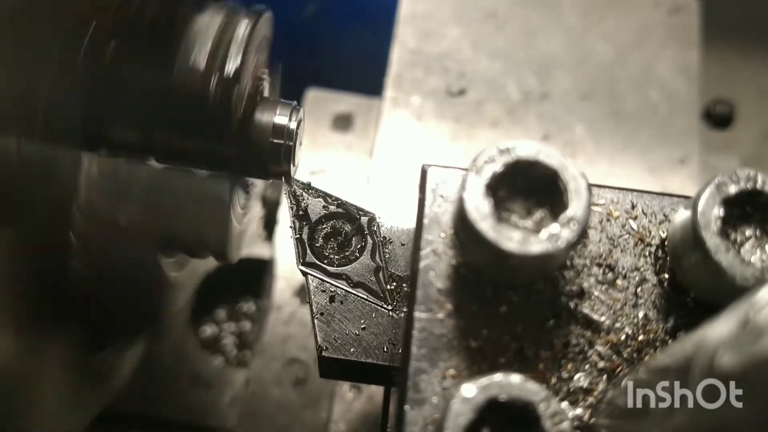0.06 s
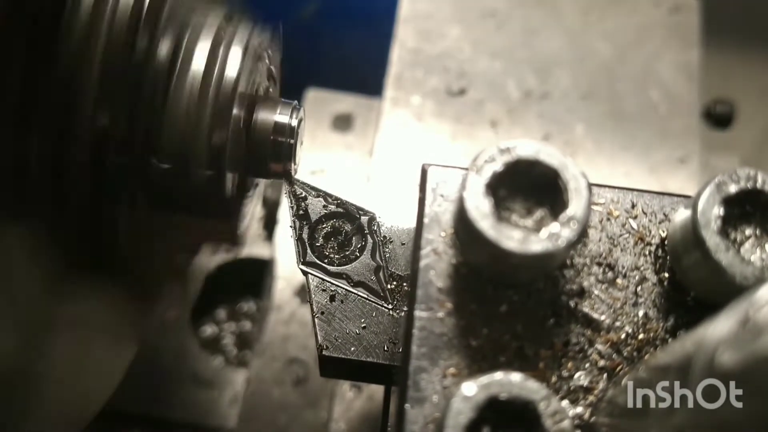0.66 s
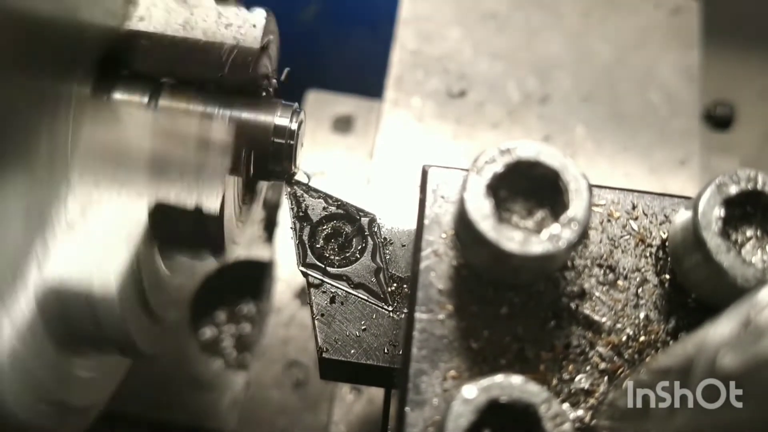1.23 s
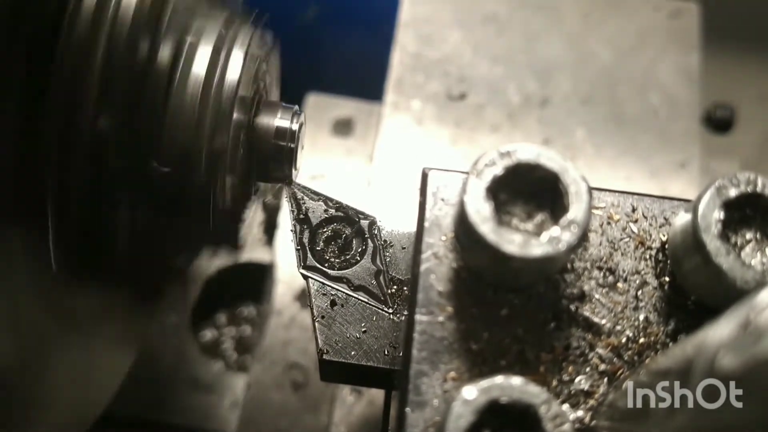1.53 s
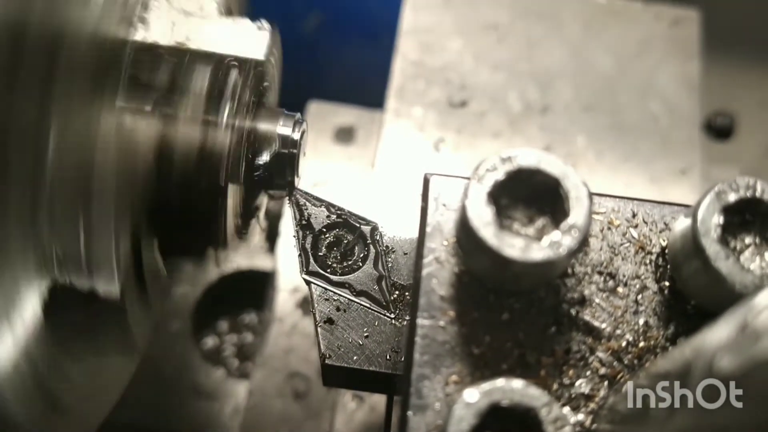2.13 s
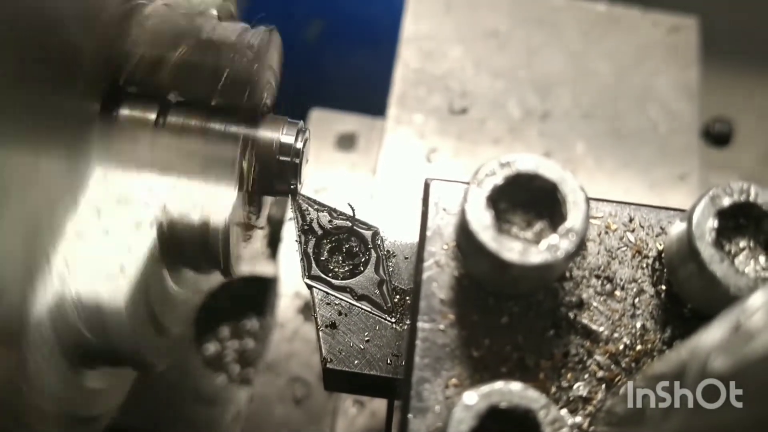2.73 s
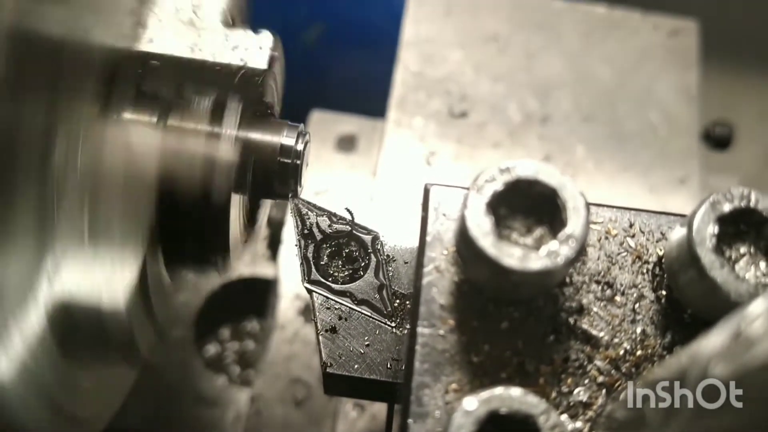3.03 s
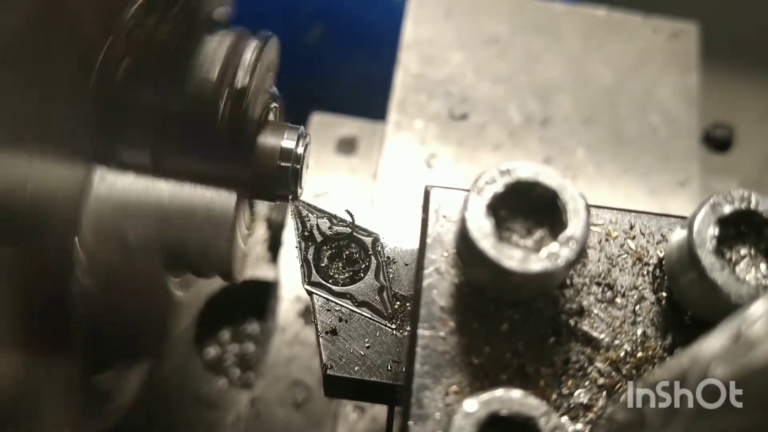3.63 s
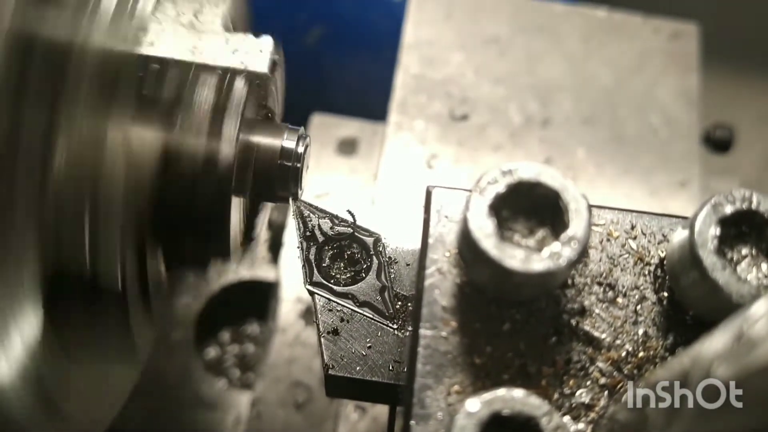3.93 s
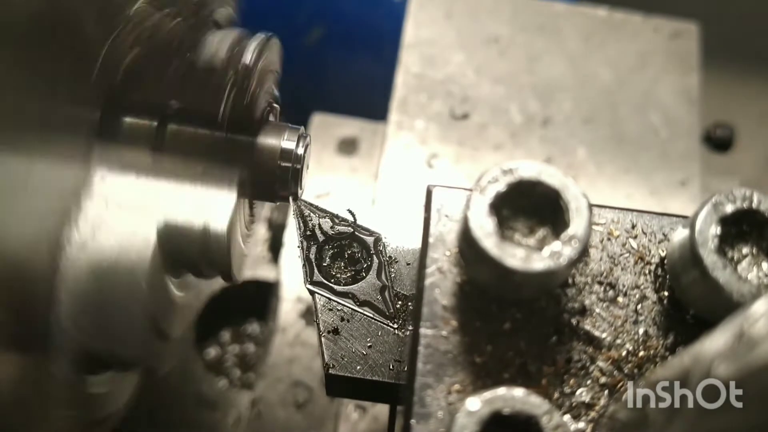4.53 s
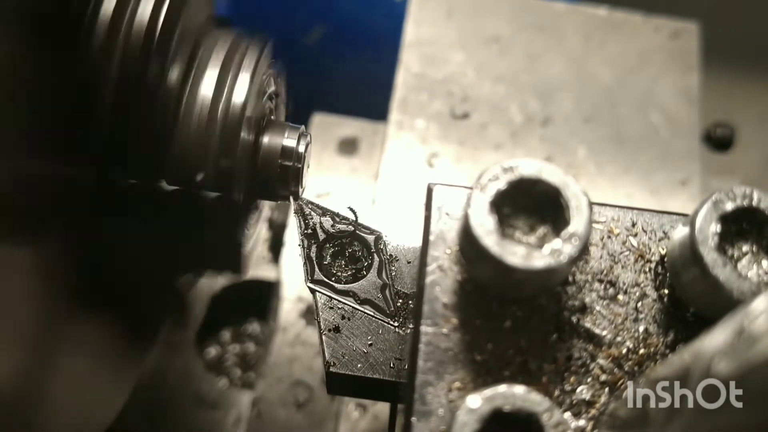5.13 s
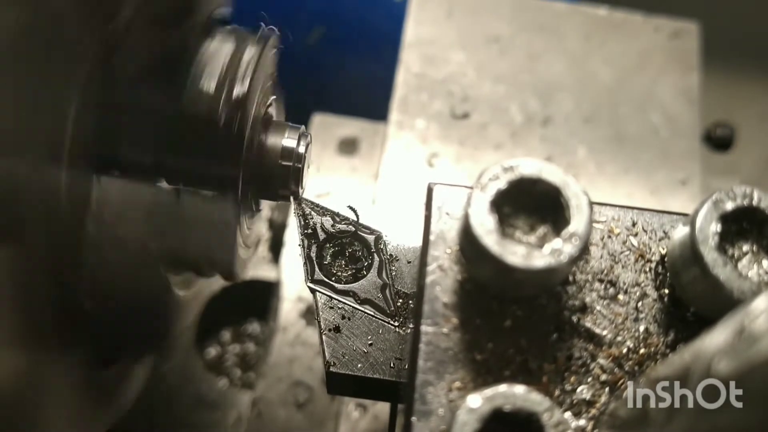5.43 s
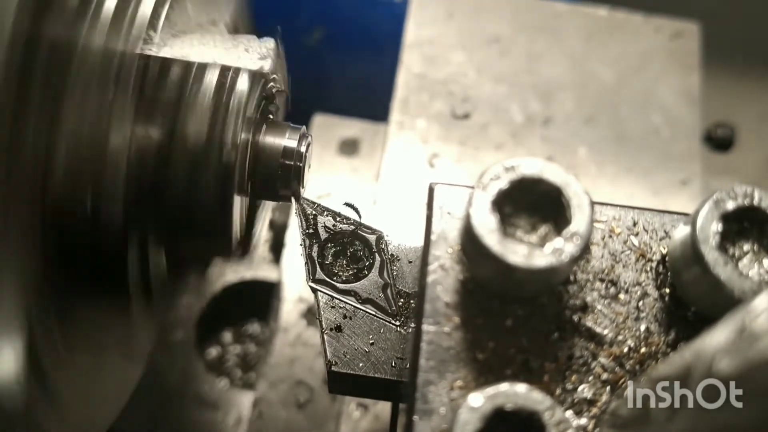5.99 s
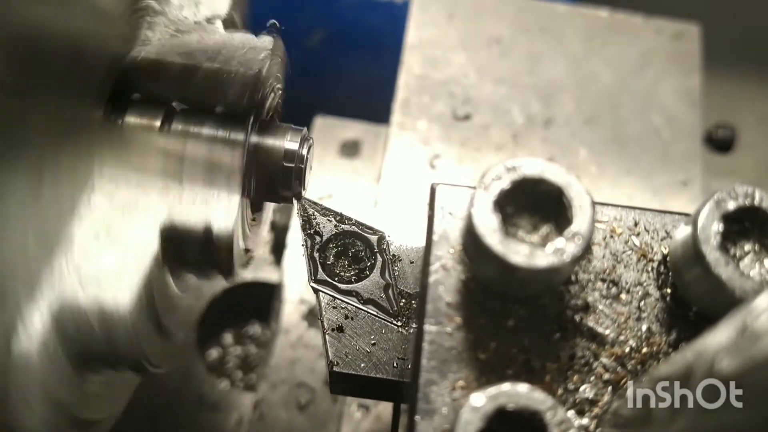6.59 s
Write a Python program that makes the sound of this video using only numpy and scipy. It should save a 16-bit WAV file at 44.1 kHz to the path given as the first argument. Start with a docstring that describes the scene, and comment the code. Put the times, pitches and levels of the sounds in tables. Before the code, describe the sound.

Close metal turning on a lathe: rhythmic scraping and knocks grow into loud chatter, pause briefly, then return with a piercing squeal.

```python
"""A small lathe, close up, turns a hardened steel part in two passes over the hum and whine of its drive.
First the part's high spots rasp and chirp on the tool tip, once a turn. The cut deepens, single bites
knock the tool post, then it breaks into chatter until the tool is drawn back near 3 s, leaving the drive.
From 4 s the tip grazes the steel again and sticks and slips in one long, sinking squeal. Near 5.6 s
this breaks up into short squeals, while rasp and chatter build once more."""
import sys
import numpy as np
from scipy import signal
from scipy.fft import rfft, irfft, next_fast_len
from scipy.io import wavfile
from scipy.ndimage import uniform_filter1d

SR = 44100
rng = np.random.default_rng(int(sys.argv[2]) if len(sys.argv) > 2 else 0)


def unload_wav(signal):
    """Save mono or channel-first audio to the path in sys.argv[1] as 16-bit WAV at rate SR, clipped to [-1, 1]."""
    wavfile.write(
        sys.argv[1],
        SR,
        np.round(np.clip(np.atleast_2d(signal).T, -1, 1) * 32767).astype(np.int16),
    )


N = 297671
TIME = np.arange(N) / SR
TURN_S, PASS_CHANGE_S = .1189, 3.5

# Workshop rumble. Each row: frequency in Hz, noise density in dB.
RUMBLE_SPECTRUM = [(15, -22), (35, -13), (55, -3), (90, -12), (200, -16), (1000, -70)]
# Stereo width of the noises. Each row: frequency in Hz, left-right likeness from 0 to 1.
STEREO_LIKENESS = [(30, 0.6), (150, 0.89), (300, 0.57), (700, 0.87), (1500, 0.15), (4000, 0.14),
                   (12000, 0.029)]
# Bearings and belt. Each row: frequency in Hz, noise density in dB.
BEARING_SPECTRUM = [(15, -55), (25, -56), (118, -13.5), (152, -10.5), (233, -17), (277, -10.5), (390, -9),
                    (519, -18), (756, -3), (972, -11.5), (1450, -11.5), (1960, -19), (4370, -28.5),
                    (5080, -24), (7590, -45.5), (10000, -29.5), (13000, -53), (22000, -120)]
# Motor and gear tones. Each row: pitch in Hz, level in dB within the drive.
DRIVE_TONES = [(156.1, -6.5), (208, -23), (264, -17), (280.5, -8), (604, -7.5), (687, -6), (728, -10.5),
               (781, -4), (843, -6.5), (1054.5, -5.5), (1405, -3.5)]
# Sidebands of the motor supply's switching whine. Each entry: offset in multiples of the field rate.
WHINE_ORDERS = [-12, -11, -10, -9, -8, -7, -5, -4, -3, -1, 0, 1, 2, 3, 5, 6, 9]
# The same sidebands. Each entry: level in dB within the drive.
WHINE_DB = [-20, -20, -20, -15, -18, -15, -20, -14, -11, -12, -6.5, -15, -10, -8.5, -18, -18, -19]
WHINE_HZ, FIELD_HZ = 11922, 52
# The drive ducks under the chatter. Each row: chatter level in dB, drive level in dB.
DRIVE_DUCKING = [(-48, -42), (-33, -43), (-21.5, -45.5), (-16, -56)]

# The first cut deepens until the tool is drawn back. Each row: time in seconds, chatter level in dB,
# rasp level in dB, rasp tilt (higher is brighter).
FIRST_CUT = [(0, -45, -35.5, 18), (0.3, -32.5, -29, 3.5), (0.85, -28.5, -24.5, 2.5), (1.15, -21, -29.5, -6),
             (1.33, -19, -28, -3.5), (1.55, -15, -30.5, -3.5), (2.4, -14.5, -38.5, -7),
             (2.72, -13, -35.5, -7), (2.83, -17, -23.5, 4.5), (2.97, -36.5, -78, -24.5)]
# The second cut deepens to the end. Each row reads as in the first cut.
SECOND_CUT = [(4.45, -39, -56, -12), (4.7, -37.5, -40, 14), (5.1, -35.5, -38, -2.5), (5.55, -30, -19.5, 2),
              (5.9, -24, -21, -1.5), (6.3, -19.5, -24, -1.5), (6.75, -18.5, -26, -4.5)]
# High spots in the first cut. Each row: place in turns, half width in turns, then boosts in dB for rasp,
# light chatter and deep chatter.
FIRST_SPOTS = [(.045, 0.045, 4, -1, 2), (.135, 0.065, 8.5, 1, -5), (.21, 0.063, 7.5, -6.5, 4),
               (.34, 0.027, 1, 6, 1.5), (.545, 0.024, 2, -0.5, -7), (.755, 0.068, -2.5, 7, 3.5),
               (.872, 0.038, 11, 3.5, 3.5), (.92, 0.029, 6, -1.5, 4)]
# High spots in the second cut. Each row reads as in the first.
SECOND_SPOTS = [(.07, 0.04, -2.5, 3, 1), (.208, 0.027, 11, -18, -6), (.275, .045, 3, 1, -3),
                (.46, 0.097, -4.5, 3, 6), (.6, 0.057, 11, 5, 4), (.705, .06, 3.5, 3.5, 7),
                (.84, 0.06, 8.5, 2, 2), (.92, 0.029, 6.5, -1.5, 4)]
# Stereo spread of the cut. Each row: frequency in Hz, left over right in dB, left phase lead in radians.
CUT_BALANCE = [(1210, -2.5, 1.24), (2540, -2.5, 0), (2800, 5.5, -0.3), (3245, -1, 1.06), (3570, 7, 0.2),
               (3870, -3.5, -3), (3930, -4, 2.5), (4970, -0.5, 0), (5150, -4, -1.4), (5630, 3, -1.54),
               (6120, -7, -0.77), (6760, -1.5, -0.2), (7065, 3, 3.5), (7340, -1, 1.04), (9750, -3.5, 1),
               (10260, -7.5, -1.05), (11500, -.5, -0.9), (12700, -4, -1.5), (14000, -2, -1)]

# Single bites that jolt the tool post. Each row: start in seconds, peak level in dB.
KNOCKS = [(.39, -28), (.511, -19), (.624, -14.5), (.745, -12), (.787, -21), (.865, -14.5), (.906, -16),
          (.985, -19), (1.026, -17.5), (1.071, -14.5), (1.103, -18), (1.148, -16.5), (1.186, -12),
          (1.223, -13), (1.269, -11.5), (1.304, -13), (5.534, -20.5), (5.657, -14), (5.782, -24),
          (5.864, -14.5), (5.901, -21), (6.022, -23), (6.141, -14)]
# The tool post's swing. Each row: time in seconds, pitch in Hz.
CHATTER_PITCH = [(.9, 723), (1.3, 704), (2.0, 714.5), (5.5, 714), (6.75, 701)]
LIGHT_CHATTER_DB, DEEP_CHATTER_DB = -17, -15  # crossfade from the light boosts to the deep ones
# Rubbing steel. Each row: frequency in Hz, EQ gain in dB.
RASP_SPECTRUM = [(560, -7.5), (950, 3), (1250, -6.5), (2000, -6), (2600, -7), (3150, -6), (3900, -7.5),
                 (4500, -3), (5300, -5), (6300, -8.5), (7400, -9), (8400, -16), (10200, -9), (11000, -11),
                 (13500, -8.5), (15900, -16)]
# Resonances of tool and part. Each row: frequency in Hz, width in Hz, relative level in dB.
TOOL_MODES = [(1443, 300, -4), (2630, 48, 0), (2959, 43, -5.5), (3738, 25.7, -0.5), (4365, 150, -6.5),
              (6110, 33, -20), (6930, 40, -37), (9980, 170, -3.5)]

# The tip just grazes the steel. Each row: start in seconds, length in seconds, pitch in Hz, level in dB.
GRAZES = [(0.897, 0.0074, 5550, -14.5), (0.906, 0.011, 5484, -24), (2.83, 0.035, 3505, -29),
          (2.859, 0.02, 3564, -22.5), (4.01, 0.0074, 3646, -17.5), (4.04, 0.017, 3550, -17.5),
          (4.082, 0.0074, 3600, -16.5), (4.125, 0.0083, 3630, -18), (4.158, .013, 3620, -15),
          (4.276, 0.012, 3655, -15), (4.512, 0.015, 3647, -16), (4.554, 0.01, 3655, -18),
          (4.592, 0.022, 3540, -17.5), (4.624, 0.024, 3536, -18), (4.665, 0.021, 3510, -18.5)]
GRAZE_GLIDE, GRAZE_HALF_DB = .06, -29.5  # share of pitch; base half-order level
# A high spot catches the tip, which chirps, mostly upward, as it tears free. Each row: start and length
# in seconds, pitch in Hz, level in dB, glide as a share of pitch, base half-order level in dB.
CHIRPS = [(0, 0.021, 3036, -20.5, 0.13, -9), (.024, 0.0059, 3454, -16.5, 0.052, -12.5),
          (0.034, 0.02, 3150, -22.5, -0.0087, -15), (0.054, 0.0078, 4150, -16, 0.26, -7),
          (.101, .011, 3193, -23, -0.18, -14), (0.118, .021, 3020, -20, 0.14, -12),
          (0.143, 0.0058, 3470, -15.5, 0.021, -13.5), (0.154, 0.012, 3096, -22.5, -0.053, -10),
          (0.167, 0.0072, 3650, -16, 0.27, -5), (.221, 0.0089, 3163, -20, .08, -11),
          (.239, 0.0182, 3050, -20, 0.1285, -15), (.258, 0.00603, 3557, -18, .15, -9.5),
          (0.339, .01, 3470, -17, 0.41, -9), (.364, 0.017, 3220, -22.5, .12, -11.5),
          (.459, .01, 3590, -15, 0.34, -14), (0.484, 0.015, 3446, -21, 0.21, -8.5),
          (.579, .01, 3800, -13.5, 0.16, -15.5), (0.604, .015, 3460, -20, 0.15, -10),
          (0.7, .012, 3950, -13.5, .15, -16), (0.727, 0.01296, 3900, -17, .5, -8),
          (.819, .011, 4000, -13.5, 0.14, -24), (0.845, 0.0048, 3530, -20, .05, -14),
          (.855, .01, 4790, -14, 0.33, -5), (.938, .011, 4100, -14, 0.1, -16),
          (.97, 0.012, 4460, -13.5, 0.37, -14), (1.058, 0.007, 3910, -13.5, .1, -15),
          (1.086, .011, 4200, -18.5, 0.48, -9.5), (1.177, .007, 3950, -20, 0.18, -10.5),
          (1.208, .01, 4400, -18.5, .28, -7)]
# Spots that squeal once a turn. Each row: run start, run end and squeal length in seconds, first and last
# pitch in Hz, first and last level in dB, glide as a share of pitch, base half-order level in dB.
SQUEAL_RUNS = [(1.133, 1.55, 0.0066, 5330, 5165, -19, -17, .02, -32),
               (1.326, 1.98, 0.0084, 4550, 4490, -22.5, -33, .2, -6),
               (1.608, 2.02, 0.0088, 5320, 5150, -27, -23.5, .03, -28),
               (5.595, 5.77, 0.025, 3334, 3480, -23, -21, .04, -8.5),
               (5.681, 6.7, 0.018, 3105, 3277, -23.5, -32.5, .08, -7.5),
               (5.812, 6.7, 0.0085, 4457, 4390, -16.5, -19, -.01, -24),
               (5.848, 6.03, 0.0084, 3400, 3230, -23, -28.5, -.25, -8.5)]
SHORT_SAG = 0.038  # chirps and runs droop at both ends by this share of pitch
# The longer the tip sticks, the lower and brighter it squeals. Each row: pitch in Hz, overtone gain in dB.
BRIGHTNESS = [(2900, 0), (3350, -1), (3500, -11.5), (3620, -20.5), (4000, -27), (4400, -12), (5400, -33)]
# The tool body favours some squeal overtones. Each row: frequency in Hz, gain in dB.
OVERTONE_EQ = [(5500, -5), (5900, -2), (6350, 5), (7000, 2.5), (7700, -7), (8500, -23), (9600, 0),
               (10200, 7.5), (11000, -16), (12800, -1), (14000, -4), (16000, -16), (22000, -40)]
# The long squeal sinks as the cut deepens. Each row: time in seconds, centre pitch in Hz, level in dB,
# sag depth in Hz, sag on the part's high side in Hz.
LONG_SQUEAL = [(4.704, 3518, -20, 165, 30), (4.999, 3377, -20, 151, 50), (5.2, 3274, -19.5, 120, 89),
               (5.42, 3162, -19.5, 60.4, 204), (5.591, 3140, -23, 40, 219.4)]
SAGS_PER_TURN, SAG_TURN, HIGH_SIDE_TURN = 3, .275, .8
# Breaking up, it pumps more with the high spots. Each row: time in seconds, share of their boost.
SQUEAL_PUMPING = [(5.1, 0.054), (5.45, 0.59)]
# Partials of the long squeal. Each entry: a multiple of its pitch.
STICK_ORDERS = [.5, 1, 1.5, 2, 2.5, 3, 4]
# As it sags, every other slip weakens and half orders appear. Each row: pitch in Hz, grit level in dB,
# then the level of each partial in dB.
STICK_TIMBRE = [(3030, -9, -20.5, -1, -10.5, -7, -11, -16, -10),
                (3156, -14.5, -13, -2.5, -1.5, 1, -11.5, -21, -13),
                (3310, -20, -18.5, -5.5, -18, -3.5, -37, 0, -13),
                (3362, -23.5, -32, 1, -19, -8.5, -48, -2.5, -9.5),
                (3570, -34.5, -45, 1.5, -33, -15, -47, -25, -26)]
# The tip rings on after a squeal. Each row: frequency in Hz, width in Hz, gain in dB.
TIP_RINGS = [(3510, 55, -21), (4520, 141, -10), (5260, 86, -8)]


def from_db(db):
    """Decibels to gain."""
    return 10 ** (np.asarray(db) / 20)


def rms_one(x):
    """Scale to unit power."""
    return x / np.sqrt(np.mean(x ** 2) + 1e-20)


def along(rows, x):
    """Read a table's other columns where its first column equals x."""
    first, *columns = np.transpose(rows)
    return [np.interp(x, first, c) for c in columns]


def at_hz(points, hz):
    """Read a spectrum on a log-frequency axis."""
    f, value = np.transpose(points)
    return np.interp(np.log(np.maximum(hz, 1)), np.log(f), value)


def drift(rate):
    """A smooth random modulator of spread 1 that moves about rate times a second."""
    count = 8192 if rate < 100 else 65536
    hz = np.fft.rfftfreq(count, N / SR / count)
    slow = rms_one(irfft(rfft(rng.standard_normal(count)) / (1 + (hz / rate) ** 4)))
    return np.interp(TIME, np.linspace(0, N / SR, count), slow)


def angle_of(hz):
    """Running phase of a moving pitch."""
    return 2 * np.pi * np.cumsum(hz) / SR


def resonate(x, hz, width_hz):
    """One resonance, gain 1 at its peak."""
    r = np.exp(-np.pi * width_hz / SR)
    feedback = [1, -2 * r * np.cos(2 * np.pi * hz / SR), r * r]
    return signal.lfilter((1 - r * r) / 2 * np.array([1, 0, -1]), feedback, x)


def pass_filter(x, kind, hz, order=2):
    """A gentle low-pass or high-pass."""
    return signal.sosfilt(signal.butter(order, hz, kind, fs=SR, output="sos"), x)


def colour(pair, spectrum):
    """EQ two signals as mid and side: stereo of unit power, narrow in the bass and wide on top."""
    size = next_fast_len(N + 1, True)
    hz = np.fft.rfftfreq(size, 1 / SR)
    mid, side = rfft(pair, size) * from_db(at_hz(spectrum, hz))
    alike = np.clip(at_hz(STEREO_LIKENESS, hz), -1, 1)
    stereo = np.sqrt(1 + alike) * mid + np.sqrt(1 - alike) * side * [[1], [-1]]
    return rms_one(irfft(stereo, size)[:, :N])


def pan(x, left_db):
    """Set the left side left_db above the right."""
    return x * from_db([[left_db / 2], [-left_db / 2]])


def reflections(x, t60, gap_s):
    """A dense, dying cloud of echoes, different at each ear."""
    t = np.arange(int(t60 * SR)) / SR
    cloud = rng.standard_normal((2, len(t))) * from_db(-60 * t / t60) * (t > gap_s)
    cloud /= np.sqrt(np.sum(cloud ** 2, axis=1, keepdims=True))
    return signal.fftconvolve(np.broadcast_to(x, (2, N)), cloud, axes=1)[:, :N]


def rumble(level_db):
    """The workshop's steady bed of low noise."""
    return from_db(level_db) * colour(rng.standard_normal((2, N)), RUMBLE_SPECTRUM)


def drive(level_db, noise_db=5.0, hiss_db=2.5, waver_db=1.7):
    """Wavering motor and gear tones over bearing noise, topped by the whine of the supply."""
    hum = whine = 0
    for hz, db in DRIVE_TONES:
        gain = from_db(db + waver_db * drift(4.1))
        hum += gain * np.sin(angle_of(hz * (1 + 0.001464 * drift(5.2))))
    for order, db in zip(WHINE_ORDERS, WHINE_DB):
        angle = angle_of(WHINE_HZ + order * FIELD_HZ + 1.2 * drift(10.4))
        whine += from_db(db) * np.sin(angle + rng.uniform(0, 2 * np.pi, (2, 1)))
    hiss = rms_one(resonate(resonate(rng.standard_normal((2, N)), 11980, 480), 11580, 860))
    bearings = colour(rng.standard_normal((2, N)), BEARING_SPECTRUM)
    sound = np.sqrt(2) * (hum + whine) + from_db(hiss_db) * hiss + from_db(noise_db) * bearings
    return pan(sound, 1.6) * from_db(level_db)


def high_spots(spots, valley_db=-6.5):
    """Boosts in dB for rasp, light chatter and deep chatter as each high spot hits the tip, once a turn."""
    place, width, rasp_db, light_db, deep_db = np.transpose(spots)
    turn = np.linspace(0, 1, 512)
    past = ((turn[:, None] - place + .5) % 1 - .5) / width
    contact = np.exp(-(past / np.where(past < 0, 0.66, 1.23)) ** 2)  # steep attack, long tail
    boosts = valley_db + contact @ rasp_db, contact @ light_db, contact @ deep_db
    return np.array([np.interp(TIME / TURN_S % 1, turn, db) for db in boosts])


def knocks(pitch_hz=742.3, rise_s=0.0064, decay_s=0.012):
    """Each jolt takes a few cycles to set the tool post swinging, then dies away."""
    out = np.zeros(N)
    for start, db in KNOCKS:
        age = np.maximum(TIME - start, 0)
        envelope = np.exp(-age / decay_s) * (1 - np.exp(-(age / rise_s) ** 2))
        hz = pitch_hz * (1 + 0.01 * rng.standard_normal())
        out += from_db(db) * envelope / envelope.max() * np.sin(2 * np.pi * hz * age)
    return pan(out, 2.4)


def chatter(level_db, swing_db, bite_db, ripples_per_turn=7, beat_turn=.07):
    """Light bites ring the post; in a deep cut it swings by itself and beats with the part's ripples."""
    angle = angle_of(along(CHATTER_PITCH, TIME)[0]) + .62 * drift(15)
    ripple = 2 * np.pi * ripples_per_turn * (TIME / TURN_S - beat_turn) + .4 * drift(5)
    main = np.sin(angle) * from_db(1.9 * drift(16) - .7)
    main += from_db(-18.5) * np.sin(2 * angle + 1.4 * drift(80))
    # the post's second mode radiates from another side
    partner = from_db(-12.5 + 3 * drift(12)) * np.sin(angle + ripple + [[.8], [-.8]])
    swing = np.sqrt(2) * (pan(main, 1.2) + pan(partner, 3.1))
    force = (rng.standard_normal(N) + .5 * rng.standard_normal((2, N))) * from_db(bite_db)
    ring = rms_one(resonate(resonate(force, 715, 22) - resonate(force, 775, 22), 755, 150))
    ring_mix = np.clip((-11 - level_db) / 15, .35, .9)
    # the heavy post takes a few cycles to follow the force
    envelope = uniform_filter1d(from_db(level_db + swing_db), round(.005 * SR))
    return envelope * (np.sqrt(1 - ring_mix ** 2) * swing + ring_mix * ring)


def rasp(level_db, tilt, grain_db=2.0, crumble_db=1.5, flicker_db=1.0, slip_hz=2122):
    """The chip tears off in tiny slips, part random, part stumbling rhythm, that ring tool and part."""
    angle = angle_of(slip_hz * np.exp(.12 * drift(45) + .025 * drift(600)))
    screech = rms_one(sum(np.sin(k * angle / 2) for k in range(2, 10)))
    slips = .5 * rng.standard_normal((2, N)) + screech * [[.65], [0]]
    slips += .55 * reflections(screech, t60=.035, gap_s=0)
    slips *= from_db(grain_db * drift(1040) + crumble_db * drift(200) + flicker_db * drift(21))
    slips += sum(2 * from_db(db) * resonate(slips, hz, width) for hz, width, db in TOOL_MODES)
    rub = pass_filter(colour(slips, RASP_SPECTRUM), "high", 250)  # the rasp carries no bass
    body = pass_filter(rub, "low", 2800, order=1)
    # a deeper cut sounds duller
    return from_db(level_db) * (body * from_db(-1.4 * tilt) + (rub - body) * from_db(0.3 * tilt))


def squeal_notes():
    """Cue list of grazes, chirps and runs: start, length, pitch, level, glide, sag, half-order level."""
    notes = [(s, length, hz, db, GRAZE_GLIDE, 0, GRAZE_HALF_DB) for s, length, hz, db in GRAZES]
    notes += [(s, length, hz, db, glide, SHORT_SAG, half) for s, length, hz, db, glide, half in CHIRPS]
    for first, until, length, first_hz, last_hz, first_db, last_db, glide, half_db in SQUEAL_RUNS:
        starts = np.arange(first, until, TURN_S)
        steps = np.linspace((first_hz, first_db), (last_hz, last_db), len(starts))
        notes += [(s, length, hz, db, glide, SHORT_SAG, half_db) for s, (hz, db) in zip(starts, steps)]
    return notes


def short_squeals(bite_db, edge_s=0.004, jitter=0.0365, wobble=0.019, shimmer_db=4.0, fray=0.033):
    """Stick-slip at the tip's own pitch; a harder bite adds grit and makes every other slip uneven."""
    gate, points = np.zeros(N), []
    for start, length, middle_hz, db, glide, sag, half_db in squeal_notes():
        gate += np.clip(.5 + np.minimum(TIME - start, start + length - TIME) / edge_s, 0, 1)
        bright_db = at_hz(BRIGHTNESS, middle_hz)
        for share in np.linspace(.04, .96, 7):
            hz = middle_hz * (1 + glide * (share - .5) - sag * (2 * share - 1) ** 2)
            points.append((start + share * length, hz, middle_hz - hz, db, bright_db, half_db))
    hz, sag_hz, level_db, bright_db, half_db = along(sorted(points), TIME)
    rough = np.clip(from_db(half_db), 0, 1)
    # the tone opens up where the pitch sags
    bright_db = np.minimum(bright_db + 10 * (np.clip(sag_hz / 160, 0, 1) - .5), 1)
    angle = angle_of(hz * (1 + wobble * drift(154.6) + jitter * rough * drift(542)))
    wave = np.sin(angle)
    for k in range(2, 5):
        gain = from_db(bright_db + at_hz(OVERTONE_EQ, k * hz)) * (k * hz < SR / 2)
        wave += gain * np.sin(k * (angle + fray * drift(370)))
    uneven = angle / 2 + 0.41 * drift(120)
    half_orders = sum(gain * np.sin(k * angle + uneven) for k, gain in enumerate((0.62, 0.5, 0.13), 1))
    grit = 0.56 * pass_filter(rng.standard_normal(N), "high", 2600)
    wave += from_db(np.minimum(half_db + bite_db - 3, -2)) * (half_orders + grit)
    level_db += shimmer_db * np.sqrt(rough) * drift(220)
    return np.sqrt(2) * np.minimum(gate, 1) * from_db(level_db) * wave


def long_squeal(bite_db, dip_db=7, edge_s=0.0042, wander_hz=22, jitter_hz=190, shimmer_db=2.8, fray=0.11):
    """Unbroken stick-slip: the pitch follows the load around the turn, and the timbre follows the pitch."""
    middle_hz, level_db, sag_hz, high_side_hz = along(LONG_SQUEAL, TIME)
    turn = TIME / TURN_S
    load = 2 * np.pi * SAGS_PER_TURN * (turn - SAG_TURN)
    hz = middle_hz - sag_hz * (np.cos(load) + 0.18 * np.cos(2 * load))  # round arcs between sharp dips
    hz -= high_side_hz * np.cos(2 * np.pi * (turn - HIGH_SIDE_TURN))
    hz += wander_hz * drift(40.3)
    grit_db, *orders_db = along(STICK_TIMBRE, hz)
    angle = angle_of(hz + jitter_hz * from_db(grit_db / 2) * drift(434))
    wave = sum(from_db(db + shimmer_db * drift(107)) * np.sin(k * (angle + fray * drift(280)))
               for k, db in zip(STICK_ORDERS, orders_db))
    wave += from_db(grit_db) * resonate(rng.standard_normal(N), 5100, 7000)
    gate = np.clip(np.minimum(TIME - LONG_SQUEAL[0][0], LONG_SQUEAL[-1][0] - TIME) / edge_s, 0, 1)
    # it swells on the high spots, thins between them and chokes briefly in each dip
    pump_db = along(SQUEAL_PUMPING, TIME)[0] * bite_db
    choke_db = dip_db * sag_hz / sag_hz.max() * np.maximum(np.cos(load), 0) ** 6
    return np.sqrt(2) * gate * from_db(level_db + pump_db - choke_db) * wave


def radiate(x):
    """Each pitch leaves the tool in its own direction."""
    size = next_fast_len(N + 1, True)
    left_db, lead = along(CUT_BALANCE, np.fft.rfftfreq(size, 1 / SR))
    left_gain = from_db(left_db / 2) * np.exp(.5j * lead)
    return irfft(rfft(x, size) * np.array([left_gain, 1 / left_gain]), size)[:, :N]


def scene(left_lag_s=.000265):
    """The mix: the turning part modulates the cut; machine bed and workshop reflect it."""
    chatter_db, rasp_db, tilt = along(FIRST_CUT + SECOND_CUT, TIME)
    boosts = np.where(TIME < PASS_CHANGE_S, high_spots(FIRST_SPOTS), high_spots(SECOND_SPOTS))
    bite_db, light_db, deep_db = boosts
    depth = np.interp(chatter_db, [LIGHT_CHATTER_DB, DEEP_CHATTER_DB], [0, 1])
    swing_db = light_db + (deep_db - light_db) * depth
    rub = rasp(rasp_db + bite_db, tilt)
    tip = short_squeals(bite_db) + long_squeal(bite_db)
    tip += sum(from_db(db) * resonate(tip, hz, width) for hz, width, db in TIP_RINGS)
    post = chatter(chatter_db, swing_db, bite_db) + knocks()
    tip = tip + .2 * reflections(tip, t60=.04, gap_s=.0005)  # off the machine bed
    cutting = radiate(rub + from_db(-1.0) * tip)
    cutting = .5 * np.tanh(cutting / .5)  # the tip can swing only so far before it leaves the steel
    workshop = 0.36 * reflections(cutting + post / 3, t60=.22, gap_s=.004)
    motor = drive(along(DRIVE_DUCKING, chatter_db)[0])
    left, right = cutting + post + workshop + motor + rumble(level_db=-62.5)
    late_left = np.interp(np.arange(N) - round(left_lag_s * SR), np.arange(N), left)
    return np.array([late_left, right])


def record(dry, cutoff_hz=16000):
    """A steep low-pass takes off the very top."""
    return signal.sosfilt(signal.ellip(12, .1, 90, cutoff_hz, fs=SR, output="sos"), dry)


dry = scene()
out = record(dry)
unload_wav(out)
```